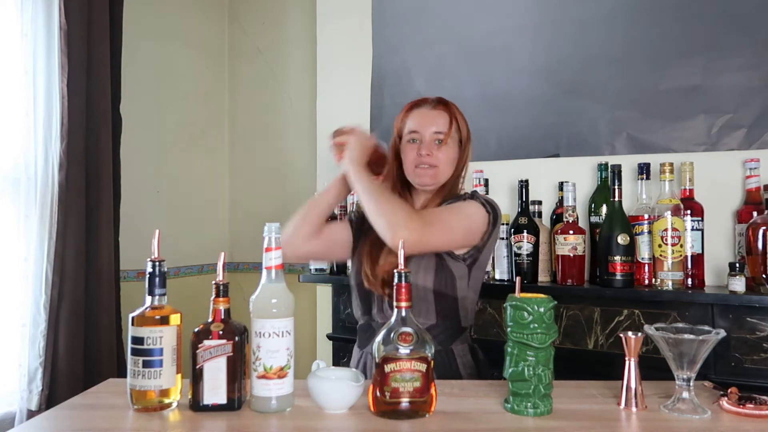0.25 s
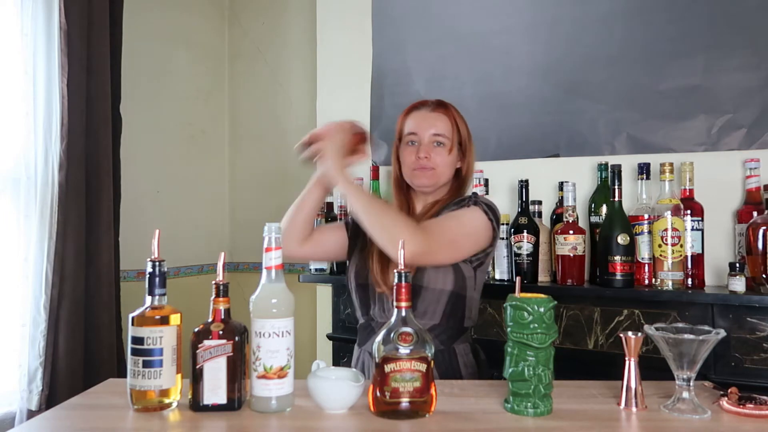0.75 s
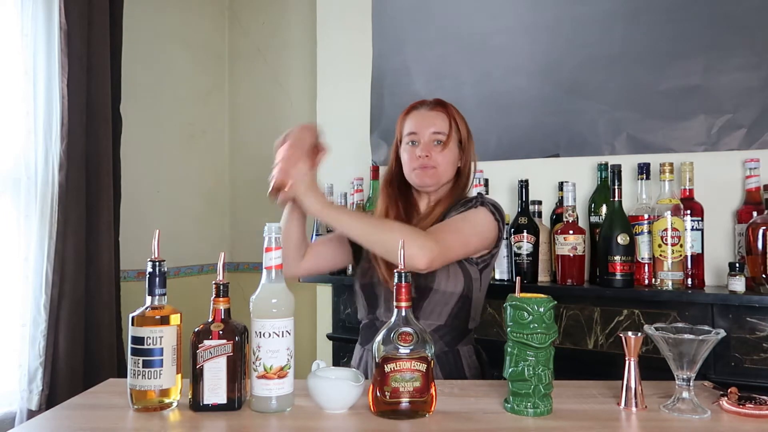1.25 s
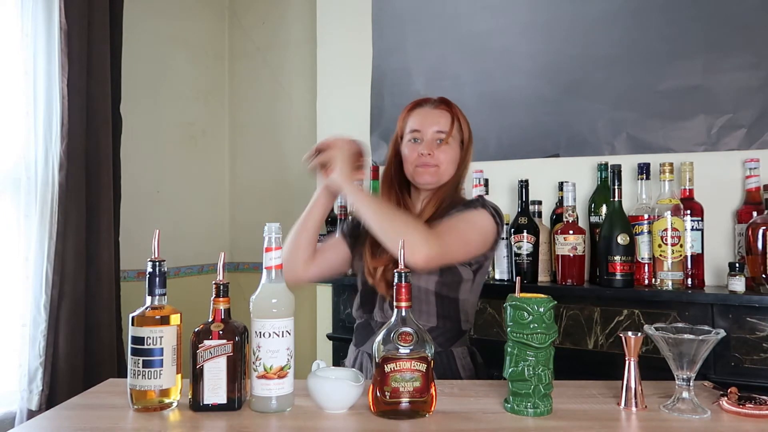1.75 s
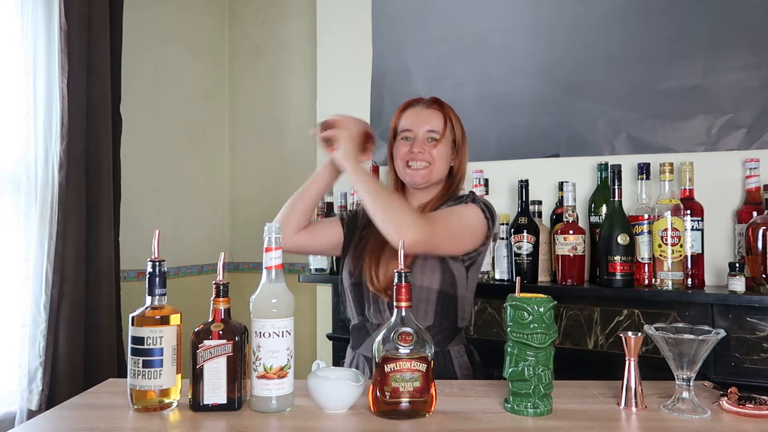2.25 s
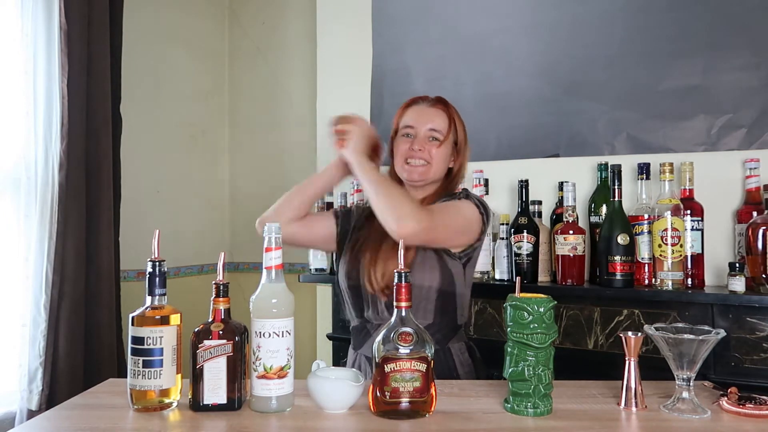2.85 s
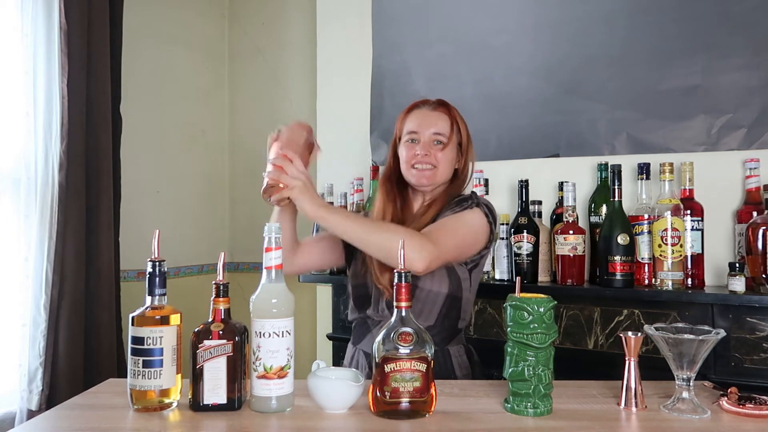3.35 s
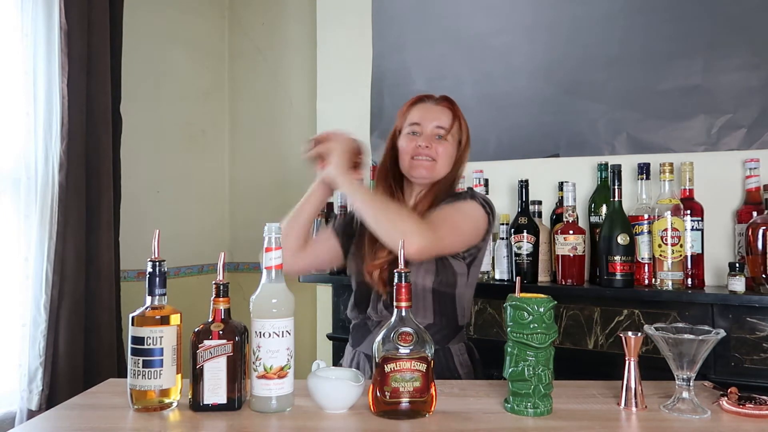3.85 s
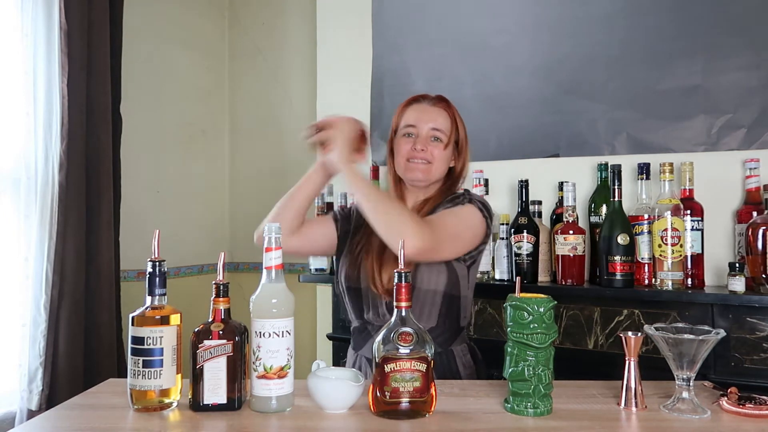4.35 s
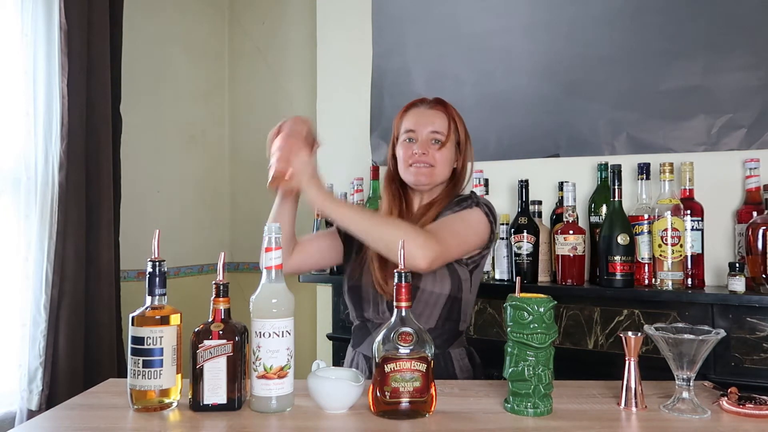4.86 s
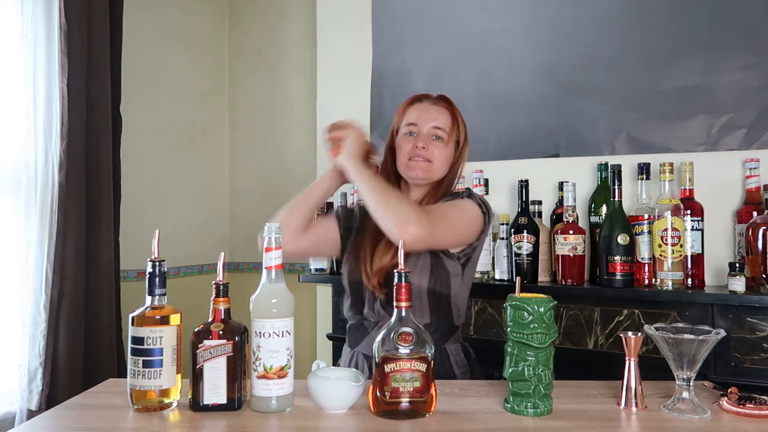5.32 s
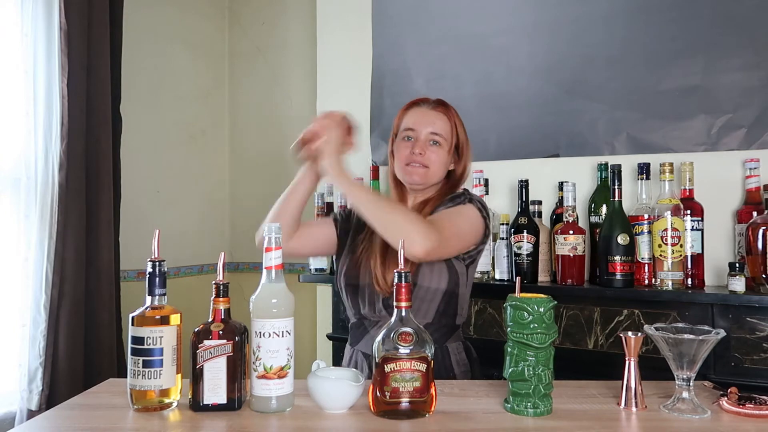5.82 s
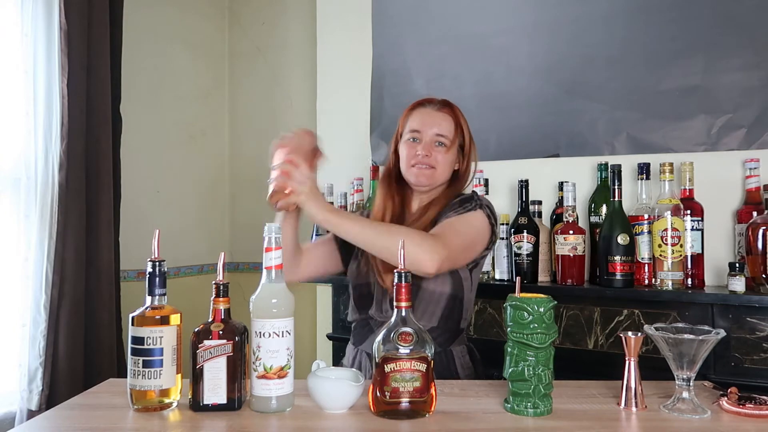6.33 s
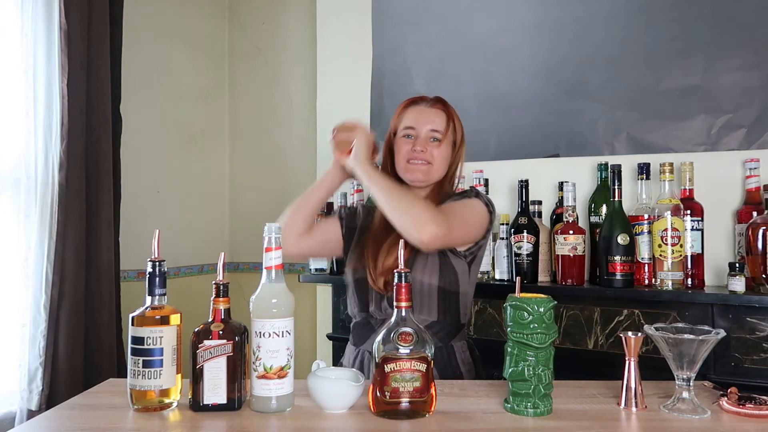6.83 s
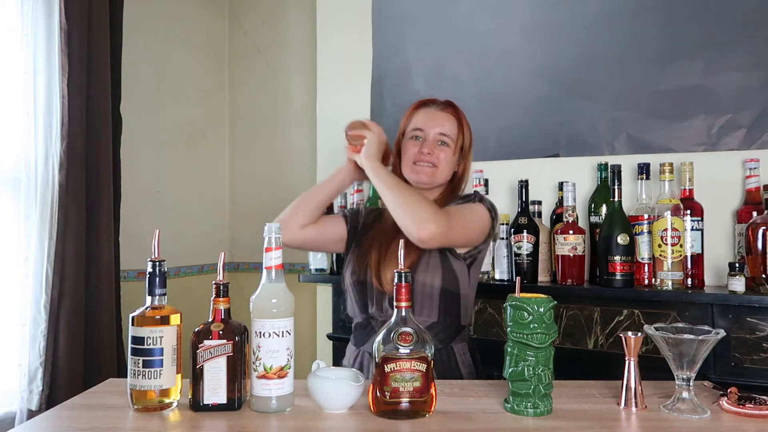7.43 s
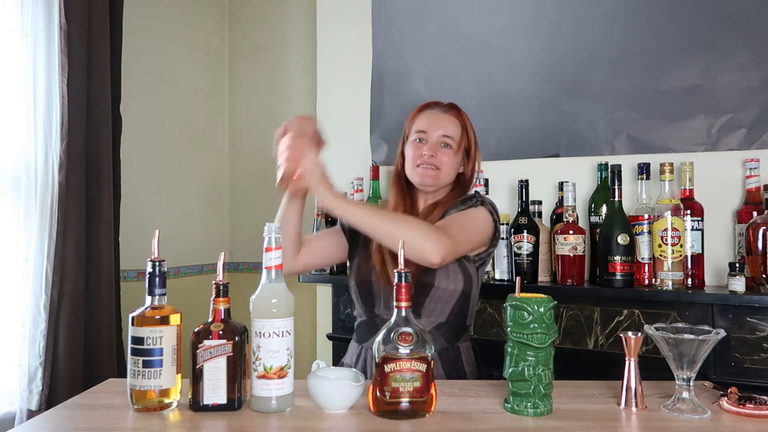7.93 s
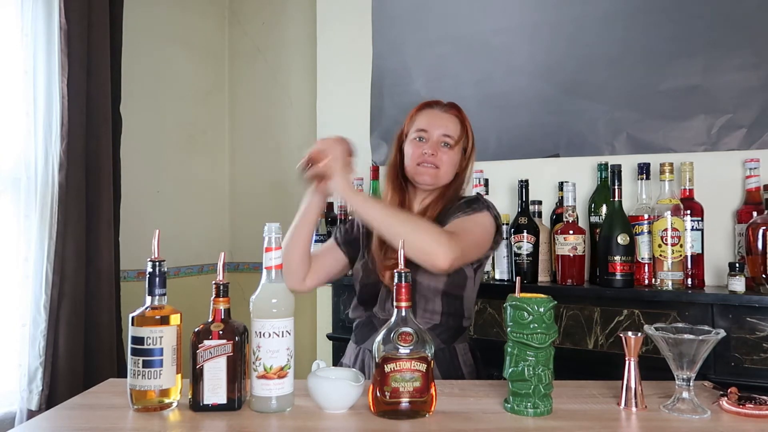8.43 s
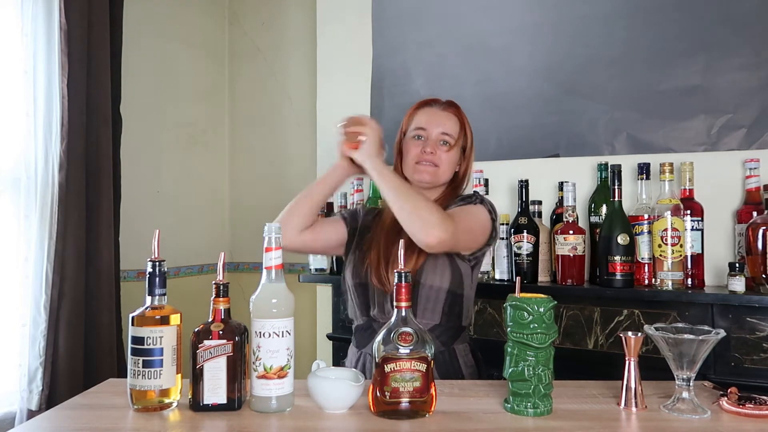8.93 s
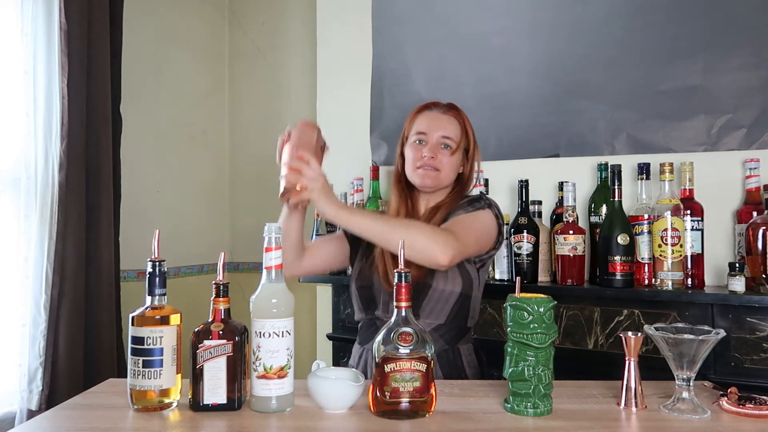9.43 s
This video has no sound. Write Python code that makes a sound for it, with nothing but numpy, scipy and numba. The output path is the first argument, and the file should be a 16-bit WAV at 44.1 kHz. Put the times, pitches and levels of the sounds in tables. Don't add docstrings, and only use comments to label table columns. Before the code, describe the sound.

Ice and liquid rattle hard back and forth in a sealed metal cocktail shaker, about three brisk strokes a second, in a small quiet room.

```python
import sys
import numpy as np
from scipy import signal
from scipy.fft import rfft, irfft, next_fast_len
from scipy.io import wavfile
from numba import njit

SR = 44100
rng = np.random.default_rng(int(sys.argv[2]) if len(sys.argv) > 2 else 0)


def level_to_linear(level):
    exponent = np.asarray(level, float) / 20
    return 10 ** exponent


def wav_out(sig):
    wavfile.write(sys.argv[1], SR, np.round(np.clip(np.atleast_2d(sig).T, -1, 1) * 32767).astype(np.int16))


N = 426888


def on_log(table, hz):
    at, value = np.transpose(table)
    return np.interp(np.log(np.maximum(hz, 1)), np.log(at), value)


def unit(x):
    return x / np.sqrt(np.mean(x ** 2))


def colour(x, gain_db):
    size = next_fast_len(N)
    hz = np.arange(size // 2 + 1) * SR / size
    return irfft(rfft(x, size) * level_to_linear(gain_db(hz)), size)[..., :N]


@njit
def rings(start, hz, t60, size, n):
    out = np.zeros(n)
    for k in range(len(hz)):
        turn = np.exp(2j * np.pi * hz[k] / SR - np.log(1000) / (t60[k] * SR))
        z, first = size[k] + 0j, int(start[k] * SR)
        for i in range(first, min(n, first + int(.5 * t60[k] * SR))):
            z *= turn
            out[i] += z.imag
    return out


def ring_out(start, hz, t60, size):
    return rings(start.ravel(), hz.ravel(), t60.ravel(), size.ravel(), N)


def cluster(s, centre_hz, db, spread_oct, smear_s, t60_s, count):
    pitch, size = rng.standard_normal((2, len(s), count))
    size = np.sign(size) * (1 + abs(size))
    size = size / np.sqrt(np.sum(size ** 2, axis=1, keepdims=True))
    pitch = pitch - np.sum(pitch * size ** 2, axis=1, keepdims=True)
    hz = np.clip(centre_hz[:, None] * 2 ** (spread_oct * pitch), 200, 16500)
    bounces = np.arange(count) % 4 > 0
    start = s[:, None] + smear_s * rng.random((len(s), count)) ** 2.3 * bounces
    return start, hz, t60_s * (hz / 2500) ** -.6, level_to_linear(db)[:, None] * size


# (frequency [Hz], level [dB per Hz])
RUMBLE = [(12, -38), (20, -5), (54, -3), (124, -7), (163, -0.5), (200, -9), (231, -1), (300, -8),
          (390, -29), (660, -120)]
# (frequency [Hz], width [Hz], level relative to the rumble [dB])
HUM = [
    (49, 27, -10),
    (102, 7.7, -10),
    (166, 23, -4.5),
    (238.5, 10, -8),
]
# (time [s], level [dB])
HOUSE_SWELL = [
    (0.0, -54.5),
    (1.61, -59),
    (4.34, -56),
    (4.96, -61.5),
    (7.55, -57),
    (9.68, -58),
]


def house():
    noise = rng.standard_normal((len(HUM) + 1, 2, N))
    out = level_to_linear(-1.5) * unit(colour(noise[0], lambda f: on_log(RUMBLE, f)))
    for (hz, width_hz, db), hiss in zip(HUM, noise[1:]):
        hum = signal.lfilter(*signal.iirpeak(hz, hz / width_hz, SR), hiss)
        out = out + level_to_linear(db) * unit(hum)
    swell_db = np.interp(np.arange(N) / SR, *np.transpose(HOUSE_SWELL))
    return out * level_to_linear(swell_db)


# (time [s], throw level [dB], slosh level [dB], return delay [s], return level [dB])
STROKES_EARLY = [(-0.083, -22, -28, 0.07, -39), (0.105, -18.5, -26, 0.14, -26.5),
                 (0.391, -20, -29, 0.12, -23.5), (0.671, -18.5, -31, 0.13, -24.5),
                 (0.957, -21, -33, 0.14, -26.5), (1.245, -22.5, -28.5, 0.12, -23),
                 (1.543, -21.5, -31, 0.137, -21), (1.829, -20.5, -35, 0.17, -20.5),
                 (2.139, -22.5, -27, 0.15, -20.5), (2.462, -19.5, -30, 0.12, -21),
                 (2.757, -19, -30.5, 0.099, -19.5), (3.026, -20.5, -34.3, 0.14, -20),
                 (3.339, -18.5, -33, 0.16, -25), (3.664, -21, -31, 0.088, -22),
                 (3.961, -19, -28, 0.13, -25), (4.258, -20.5, -30, 0.09, -24),
                 (4.564, -18.5, -33, 0.14, -26.5)]
STROKES_LATE = [(4.833, -23, -37, 0.14, -23), (5.164, -18.0, -36, 0.19, -31),
                (5.477, -20, -39, 0.13, -24.5), (5.772, -21.5, -34, 0.061, -26.5),
                (6.072, -20, -29.3, 0.13, -23), (6.37, -19, -27.5, 0.15, -28.4),
                (6.685, -21.5, -39, 0.13, -24), (7.012, -19, -38, 0.15, -22),
                (7.318, -20.5, -33, 0.14, -22), (7.628, -20.5, -29.5, 0.099, -23),
                (7.922, -20, -31, 0.14, -22), (8.209, -21, -35, 0.089, -24),
                (8.533, -20.5, -35, 0.12, -22.5), (8.825, -19.5, -31.5, 0.15, -21.5),
                (9.126, -21.5, -36, 0.151, -23), (9.453, -21.5, -30.5, 0.16, -22.5)]


def landings(t, throw_db, shape):
    s, _, _, after_s, return_db = np.transpose(STROKES_EARLY + STROKES_LATE)
    attack_s, hold_s, fall_db, throw_gain_db, return_gain_db = shape
    since = t[:, None] - np.r_[s, s + after_s]
    peak_db = np.r_[throw_db + throw_gain_db, return_db + return_gain_db]
    db = peak_db - fall_db * np.maximum(since - attack_s - hold_s, 0)
    swell = level_to_linear(db) * np.clip(since / attack_s, 0, 1)
    lull_db = -43.5
    return 10 * np.log10(np.sum(swell ** 2, axis=1) + level_to_linear(lull_db) ** 2)


# (attack [s], hold [s], fall [dB/s], throw offset [dB], return offset [dB])
SLOSH_SHAPE = (0.02, 0.048, 130, 14.6, 3)
CLATTER_SHAPE = (0.043, 0.089, 120, 0.32, 0.27)
SPLINTER_SHAPE = (0.005, 0.05, 94, 0.1, -1.5)


def stroke(s, hz):
    t = np.arange(0, N / SR + .1, .002)
    _, throw_db, slosh_db = np.transpose(STROKES_EARLY + STROKES_LATE)[:3]
    low = np.clip(np.log2(1500 / hz) / .6, 0, 1)
    high = np.clip(np.log2(hz / 5000) / 2, 0, 1)
    slosh = low * np.interp(s, t, landings(t, slosh_db, SLOSH_SHAPE))
    clatter = (1 - low - high) * np.interp(s, t, landings(t, throw_db, CLATTER_SHAPE))
    splinters = high * np.interp(s, t, landings(t, throw_db, SPLINTER_SHAPE))
    return slosh + clatter + splinters


# (frequency [Hz], level [dB per Hz])
RATTLE = [(130, -56), (220, -27.5), (650, -22), (916, -11), (1200, -8), (1870, -2.5), (2150, -3),
          (2480, -5), (2810, -1), (4200, -3.5), (4700, -7.5), (6170, -7.5), (12400, -22), (15600, -23)]


def rattle(count, scatter_db):
    s = rng.random(count) * N / SR
    db = scatter_db * np.minimum(rng.exponential(size=count), 4.5)
    centre_hz = 500 * 24 ** rng.random(count)
    start, hz, t60, size = cluster(s, centre_hz, db, spread_oct=.7, smear_s=.007, t60_s=.018, count=10)
    size = size * np.sqrt(hz / t60) * level_to_linear(on_log(RATTLE, hz))
    power = np.sum(size ** 2 * t60) / (4 * np.log(1000)) * SR / N
    size = size * level_to_linear(stroke(start, hz)) / np.sqrt(power)
    return ring_out(start, hz, t60, size)


# (frequency [Hz], level [dB], t60 [s])
TIN = [(590, -20, .08), (776, -18, .08), (910, -10, .1), (1880, -6, .07), (2200, -8, .06), (2320, 0, .12),
       (2750, -4, .07), (2845, -3, .07), (3310, -7, .06), (3700, -7, .05), (3800, -8, .05), (4070, -1, .09),
       (5940, -12, .05)]


def tin(count):
    s = rng.random(count) * N / SR
    blow = level_to_linear(1.5 * np.minimum(rng.exponential(size=count), 3))[:, None]
    blow = blow * rng.standard_normal((count, len(TIN)))
    hz, db, t60 = np.transpose(TIN)
    hz = hz * (1 + .004 * rng.standard_normal(blow.shape))
    start = s[:, None] + 0 * hz
    size = blow * level_to_linear(db - 21.5 + stroke(start, hz))
    return ring_out(start, hz, t60 + 0 * hz, size)


# (frequency [Hz], t60 [s])
ROOM_T60 = [(300, 0.22), (2000, 0.23), (12000, 0.16)]


def room(x):
    places, place_s = 5, .09
    t = np.arange(SR // 3) / SR
    tail = 0
    for hz in 125 * 2. ** np.arange(8):
        edges_hz = [hz / np.sqrt(2), min(hz * np.sqrt(2), .48 * SR)]
        band = signal.butter(2, edges_hz, "band", fs=SR, output="sos")
        t60 = on_log(ROOM_T60, hz)
        fade = 1000. ** (-t / t60) * np.clip(t / 0.0018, 0, 1) / np.sqrt(t60)
        tail = tail + signal.sosfilt(band, rng.standard_normal((places, 2, len(t)))) * fade
    tail = tail / np.sqrt(np.sum(tail ** 2, axis=2, keepdims=True))
    place = np.arange(N) / SR / place_s % places
    away = abs((place - np.arange(places)[:, None] + 1) % places - 1)
    share = np.cos(np.pi / 2 * np.minimum(away, 1))
    size = next_fast_len(N + len(t))
    spectrum = np.sum(rfft(x * share, size)[:, None] * rfft(tail, size), axis=0)
    return irfft(spectrum, size)[:, :N]


# (time [s], level [dB], centre frequency [Hz])
BELLY_RINGS = [(0.206, -27, 2200), (1.004, -24.7, 1880), (1.736, -22, 1850), (2.037, -24, 1830),
               (2.323, -26, 1840), (2.939, -22, 1930), (3.073, -23.9, 1860), (3.263, -24, 1820),
               (3.297, -24.6, 1890), (3.46, -23.0, 1880), (3.464, -24.5, 1700), (4.073, -24.5, 2060),
               (4.153, -25.2, 1860), (4.352, -24, 1830), (4.354, -21, 2024), (4.667, -21, 2120),
               (5.212, -25, 1770), (5.28, -19.3, 2210), (5.292, -28, 1820), (6.411, -20.5, 1880),
               (6.589, -24, 1910), (6.735, -23.8, 1910), (7.118, -25.4, 1750), (7.202, -22.5, 2060),
               (7.377, -24.5, 1730), (7.377, -22.3, 1910), (7.74, -29, 1790), (8.259, -27, 1840),
               (8.373, -22.4, 2200), (9.029, -24, 1830), (9.163, -24.7, 1820), (9.498, -23.6, 2190)]
SHOULDER_RINGS = [(0.711, -24.9, 3310), (1.019, -21, 3320), (1.019, -19, 2590), (1.023, -17, 2840),
                  (1.388, -23.4, 2730), (1.478, -24.7, 3420), (1.731, -21.7, 2820), (1.863, -22.1, 2770),
                  (1.961, -20.7, 3380), (2.376, -25, 2770), (2.537, -23.6, 2660), (2.829, -21.1, 2870),
                  (2.932, -25, 2700), (2.938, -21, 3430), (2.948, -22.8, 3000), (3.064, -21, 2810),
                  (3.152, -20, 2740), (3.381, -22.7, 2890), (3.459, -22, 3370), (3.461, -20, 2730),
                  (3.788, -21.0, 2760), (4.072, -19.5, 2960), (4.076, -17.5, 2700), (4.353, -21.5, 2820),
                  (4.662, -21, 3300), (4.67, -23.1, 2760), (4.998, -22.0, 2760), (5.213, -19.5, 2880),
                  (5.283, -25, 2480), (5.285, -25, 2940), (5.518, -24.4, 3390), (6.135, -18.4, 2920),
                  (6.418, -24.4, 3320), (6.474, -23.6, 3400), (7.378, -22, 2750), (7.696, -22, 2890),
                  (7.739, -19.5, 2780), (7.981, -19, 3280), (8.033, -21.0, 2660), (8.322, -24.6, 3350),
                  (8.37, -24.6, 3280), (8.601, -21.3, 2870), (8.845, -22.5, 2840), (8.893, -21.1, 3420),
                  (9.054, -23.0, 2750), (9.066, -22, 3080), (9.246, -20, 2740), (9.272, -25.2, 3410)]
CAP_RINGS = [(0.104, -29.3, 6590), (0.2, -21.8, 3680), (0.202, -30.8, 6650), (0.202, -18, 6100),
             (0.206, -23, 5510), (0.21, -23.0, 4210), (0.241, -27.0, 4910), (0.469, -29, 6900),
             (0.487, -22, 5990), (0.511, -22, 5450), (0.75, -30.6, 6730), (1.734, -25, 4900),
             (1.734, -25, 5420), (2.534, -29.4, 6440), (2.582, -27, 6360), (2.816, -28, 6470),
             (2.83, -23, 4410), (2.836, -23, 5750), (2.953, -25, 4870), (3.257, -22.1, 4090),
             (3.582, -19, 4100), (4.352, -19, 4120), (4.659, -28, 6640), (4.663, -26.9, 5960),
             (4.663, -21, 5350), (4.665, -20.4, 3580), (5.25, -27.7, 5020), (5.278, -20.6, 3820),
             (5.28, -25, 4740), (5.545, -26, 6600), (5.887, -25, 5960), (6.475, -26.9, 6030),
             (6.475, -21.7, 4060), (6.479, -22.3, 3700), (6.483, -27.1, 5000), (6.737, -25, 5200),
             (7.756, -26.4, 5630), (7.756, -25.3, 6170), (7.756, -20, 4030), (7.98, -26, 5620),
             (8.028, -19, 3800), (8.319, -21, 5030), (8.898, -24, 6010), (8.962, -27.3, 4920)]


def glancing_cubes():
    out = 0
    for table, gain_db, t60_s in ((BELLY_RINGS, 7.0, .045), (SHOULDER_RINGS, 6.5, .04), (CAP_RINGS, 5.5, .04)):
        s, db, hz = np.transpose(table)
        out = out + ring_out(*cluster(s, hz, db + gain_db, spread_oct=.06, smear_s=.017, t60_s=t60_s, count=8))
    return out


# (time [s], peak level [dB])
TICKS = [(0.1042, -14), (0.204, -6), (0.2399, -10), (0.398, -21), (0.4708, -8.5), (0.629, -15),
         (0.7552, -9), (1.0864, -13), (1.6726, -13), (1.737, -9), (2.0777, -16), (2.1585, -19),
         (2.4917, -14), (2.5057, -14), (2.585, -11), (2.6638, -10), (2.8085, -14), (3.0609, -17),
         (3.5843, -10.5), (4.5695, -17), (4.6676, -5.5), (4.999, -14), (5.5468, -9), (5.6106, -16),
         (5.658, -18), (5.887, -8), (6.1365, -9.5), (6.2257, -14), (6.4827, -8), (6.7311, -13),
         (6.822, -12), (6.9087, -11), (7.024, -17), (7.3826, -9.5), (7.5058, -15), (7.64, -17),
         (7.7583, -6), (7.9443, -17), (7.9767, -14), (8.1788, -14.5), (8.1953, -12), (8.2566, -16),
         (8.32, -10), (8.3744, -9.5), (8.5525, -15), (8.6433, -11), (8.8483, -15), (8.9645, -10)]


def edge_ticks():
    s, db = np.transpose(TICKS)
    return ring_out(*cluster(s, 0 * s + 5600, db - 3.5, spread_oct=.4, smear_s=.004, t60_s=0.021, count=30))


# (time [s], peak
# level [dB], centre frequency [Hz])
KNOCKS = [(0.2027, -9.5, 3770), (0.2428, -6, 3730), (0.7017, -5.5, 2240), (0.8598, -10, 2350),
          (0.9802, -8.5, 2320), (1.0209, 0, 2860), (1.3897, -10.5, 2740), (1.478, -8, 3420),
          (1.5718, -11, 2360), (1.719, -6.5, 2740), (1.8537, -8, 2340), (1.9643, -4, 3350),
          (2.029, -8, 1800), (2.2039, -8, 2300), (2.3159, -11, 1800), (2.4867, -7, 2550),
          (2.8044, -7.5, 2360), (2.9292, -6.5, 3380), (3.0435, -9, 2330), (3.1508, -8, 2730),
          (3.3717, -9, 2330), (3.4604, -6, 1880), (3.5843, -6, 4040), (3.7878, -4, 2270),
          (4.0724, -6, 2670), (4.156, -10, 2310), (4.2762, -10.5, 2300), (4.3514, -6, 2016),
          (4.5785, -9.5, 2340), (4.6652, -5.5, 2140),
          (4.9977, -5, 2820), (5.2114, -6.5, 2940), (5.2787, -4.5, 2190), (5.5191, -4.5, 2250),
               (5.8873, -5, 2540), (6.1365, -7, 2870), (6.3964, -11, 1880), (6.4615, -6, 3830),
               (6.7356, -5.5, 3970), (7.0208, -10, 2300), (7.117, -10, 1770), (7.1982, -6.5, 2050),
               (7.3805, -5.5, 2820), (7.507, -13, 2310), (7.64, -10, 1790), (7.7403, -3, 2830),
               (7.9432, -7, 2320), (7.9768, -6.5, 3340), (8.0345, -7, 2640), (8.1921, -10.5, 2180),
               (8.3183, -7, 3380), (8.3721, -5, 2195), (8.5511, -6, 1315), (8.6037, -4.5, 2950),
               (8.6425, -8, 2850), (8.8422, -9, 2840), (8.8733, -10, 3430), (9.146, -11, 2360),
               (9.325, -7, 2330), (9.4947, -9, 2330),
          (0.1326, -10, 2330), (0.3985, -14, 3790), (0.4364, -10, 1470), (0.4678, -9, 3670),
        (1.3114, -11, 4010), (1.4416, -11, 2310), (1.5974, -10, 4080), (1.7354, -8.5, 2830),
        (2.0744, -7, 1980), (2.1625, -12, 2320), (2.3764, -11, 2750), (2.6615, -7, 4060),
        (3.2554, -5.5, 4080), (3.7494, -8, 2330), (3.8204, -12, 2310), (3.8774, -9, 2760),
        (3.9923, -9, 4040), (4.8856, -10, 2870), (5.2524, -11, 3450), (5.655, -8, 3690),
        (6.1025, -10.5, 2920), (6.5044, -4.5, 3740), (6.5887, -12, 1920), (6.8204, -13, 2660),
        (7.0637, -8, 2880), (7.7584, -6, 4010), (8.2564, -10, 2340), (8.8917, -6, 3430), (9.0502, -7, 2730),
        (9.2707, -8, 4020)]


def cube_knocks():
    s, db, hz = np.transpose(KNOCKS)
    ring = cluster(s, hz, db - 10.5, spread_oct=0.11, smear_s=.01, t60_s=0.033, count=16)
    crack = cluster(s, 0 * s + 3300, db - 6.5, spread_oct=.6, smear_s=.008, t60_s=0.034, count=40)
    spit = cluster(s, 0 * s + 8500, db - 24, spread_oct=.4, smear_s=.014, t60_s=.04, count=30)
    under = cluster(s, 0 * s + 900, db - 32, spread_oct=0.27, smear_s=0.03, t60_s=0.011, count=14)
    return sum(ring_out(*part) for part in (ring, crack, spit, under))


# (time [s], peak level [dB], frequency [Hz])
GLUGS = [(0.133, -37, 376), (0.291, -29, 620), (0.429, -32, 622), (0.718, -32, 592), (1.569, -36, 371),
         (1.859, -36, 574), (2.164, -32, 357), (2.221, -29, 593), (2.643, -35, 620), (3.562, -30, 592),
         (3.703, -33, 620), (3.992, -32, 636), (4.275, -29, 400), (4.443, -33, 472), (4.893, -30.5, 377),
         (5.05, -29.5, 477), (5.209, -32, 574), (6.113, -20, 570), (6.14, -24, 500), (6.713, -34.5, 410),
         (7.334, -31, 374), (7.545, -24, 560), (7.938, -31, 412), (8.424, -33, 624), (8.547, -33, 420),
         (9.323, -35, 625)]


def glugs():
    s, db, hz = np.transpose(GLUGS)
    return ring_out(*cluster(s, hz, db + 1.5, spread_oct=.16, smear_s=.022, t60_s=0.019, count=10))


# (time [s], peak level [dB], centre frequency [Hz])
THUDS = [(0.167, -26.4, 1500), (0.175, -31, 900), (0.298, -30.5, 830), (0.436, -26.5, 930),
         (0.472, -28.2, 1530), (0.562, -30.5, 780), (0.711, -30, 970), (0.729, -28.2, 1540),
         (0.785, -26, 1460), (1.001, -31, 1040), (1.284, -30.9, 950), (1.452, -31, 930),
         (1.587, -31.0, 915), (1.859, -30.5, 960), (2.174, -24, 1080), (2.2, -30.6, 970), (2.23, -24, 1500),
         (2.659, -31, 1100), (2.791, -25.6, 1010), (2.878, -30, 1220), (2.974, -29, 1420),
         (3.377, -27, 1540), (3.379, -29.1, 900), (3.463, -27, 1500), (3.707, -29.7, 940),
         (4.17, -29.0, 890), (4.277, -28, 1140), (4.303, -26, 936), (4.349, -31, 1100), (4.367, -30, 1350),
         (4.449, -34, 790), (4.581, -25, 1180), (4.587, -26.1, 925), (5.507, -30, 937), (5.834, -32, 930),
         (6.107, -32, 1010), (6.117, -27.8, 1540), (6.426, -26.4, 1540), (7.047, -29, 1490),
         (7.536, -27.4, 1030), (7.538, -28.2, 1540), (7.644, -27.8, 1100), (7.658, -24.4, 890),
         (7.694, -30.2, 904), (7.745, -29, 1510), (7.955, -30.8, 970), (8.266, -32, 940),
         (8.554, -20.5, 1420), (8.879, -30.3, 940), (9.152, -28.1, 1080), (9.36, -25.3, 1370),
         (9.503, -28, 1020)]


def end_thuds():
    s, db, hz = np.transpose(THUDS)
    return ring_out(*cluster(s, hz, db + 8.0, spread_oct=0.09, smear_s=0.022, t60_s=0.028, count=8))


# (time [s], peak level [dB])
BASE_BLOWS = [(0.17, -25), (0.423, -26), (0.559, -23.5), (0.694, -25.1), (0.762, -24), (0.85, -22.5),
              (0.99, -23), (1.441, -25.2), (1.73, -24.0), (1.854, -22), (1.948, -24), (2.033, -22),
              (2.161, -25.0), (2.205, -21.5), (2.814, -22), (2.867, -23.1), (3.053, -20.5), (3.087, -23),
              (3.241, -25.4), (3.366, -18.5), (3.414, -22.9), (3.788, -21.7), (3.813, -24), (3.999, -24.5),
              (4.278, -21), (4.434, -23.9), (4.586, -22.5), (4.715, -23.4), (5.027, -22), (5.214, -21),
              (5.513, -25.5), (5.944, -23.1), (6.407, -23.2), (6.733, -28), (7.024, -22), (7.22, -22),
              (7.343, -22.5), (7.417, -25.5), (7.511, -24), (7.649, -25.5), (7.806, -22), (7.942, -19),
              (8.249, -24.9), (8.397, -24), (8.71, -22), (8.882, -23.9), (9.145, -22), (9.335, -21),
              (9.496, -22), (9.65, -23)]


def base():
    mode_hz, t60_s = 2322, .07
    s, db = np.transpose(BASE_BLOWS)
    detune, wait = rng.random((len(s), 2)).T
    hz = np.tile(mode_hz * (1 + .012 * (detune - .5)), 2)
    start = np.r_[s, s + .008 + .012 * wait]
    return ring_out(start, hz, t60_s + 0 * hz, level_to_linear(np.r_[db + 3.5, db - 1.5]))


# (frequency [Hz], side minus mid [dB])
SIDE_GAIN = [(25, -22), (60, -13), (110, -20), (200, -5), (380, -7), (700, -15), (1290, -19), (2380, -14.5),
             (4400, -5.5), (8120, 4), (15000, 8)]


def scene():
    shaker = level_to_linear(-4) * rattle(count=17000, scatter_db=2.1) + level_to_linear(3.5) * tin(count=1600)
    shaker = shaker + glancing_cubes() + edge_ticks() + cube_knocks() + glugs() + end_thuds() + base()
    shaker = signal.sosfilt(signal.butter(2, 450, "high", fs=SR, output="sos"), shaker)
    shaker = signal.sosfilt(signal.butter(2, 16500, fs=SR, output="sos"), shaker)
    wet, rumble = room(shaker), house()
    mid = level_to_linear(2.2) * shaker + level_to_linear(-4) * wet[0] + rumble[0]
    side = colour(level_to_linear(1.0) * wet[1] + rumble[1], lambda f: on_log(SIDE_GAIN, f))
    return np.array([mid + side, mid - side])


def band_limit(x):
    return signal.sosfilt(signal.butter(12, 15730, fs=SR, output="sos"), x)


def record(dry):
    return band_limit(dry)


dry = scene()
out = record(dry)
wav_out(out)
```